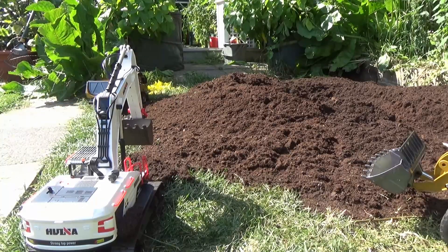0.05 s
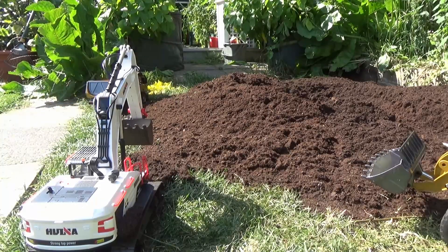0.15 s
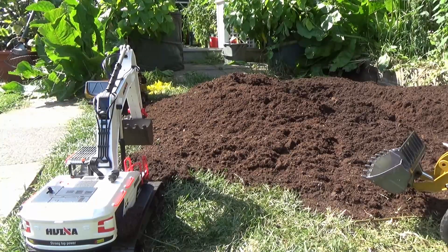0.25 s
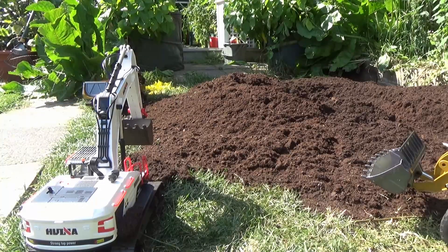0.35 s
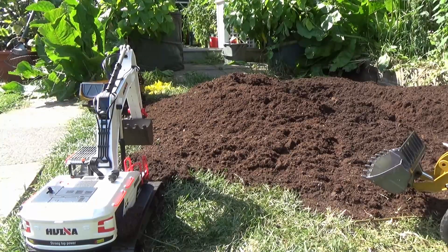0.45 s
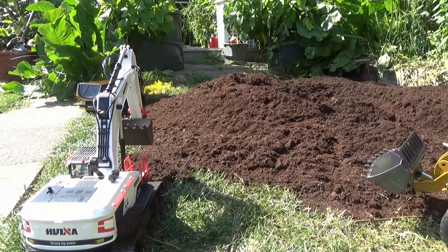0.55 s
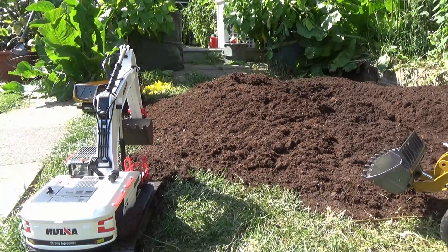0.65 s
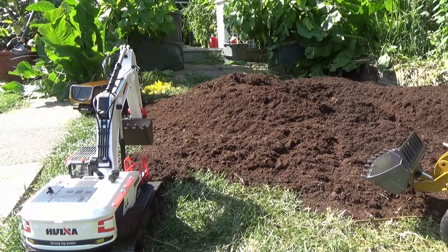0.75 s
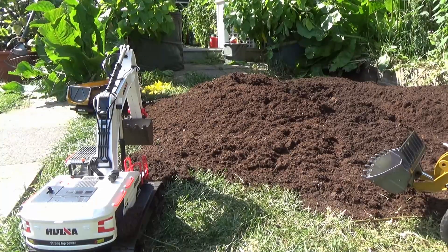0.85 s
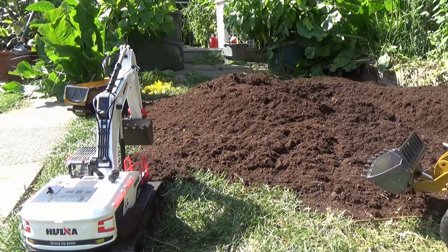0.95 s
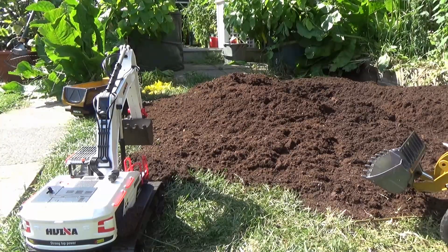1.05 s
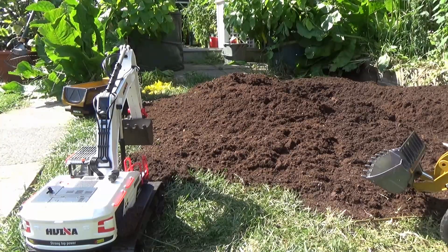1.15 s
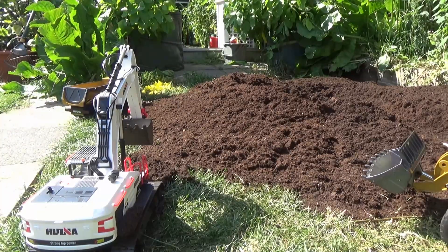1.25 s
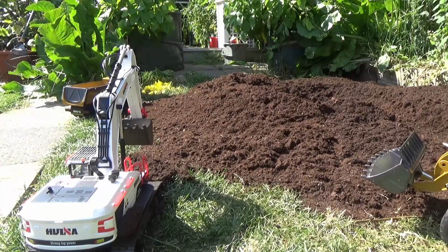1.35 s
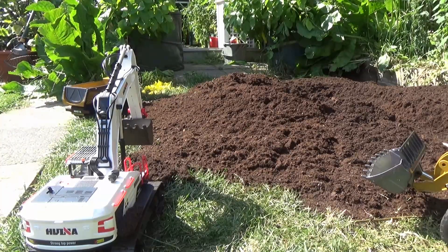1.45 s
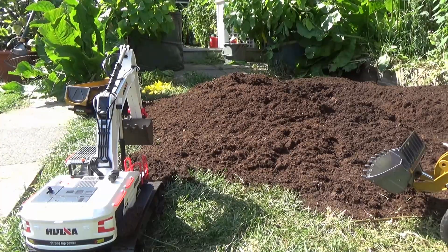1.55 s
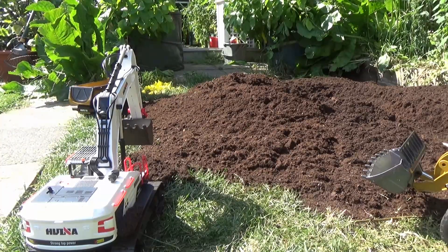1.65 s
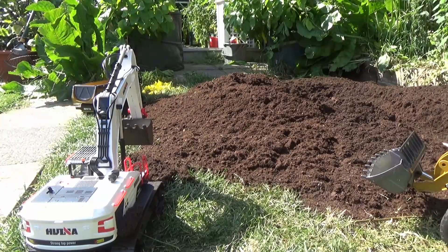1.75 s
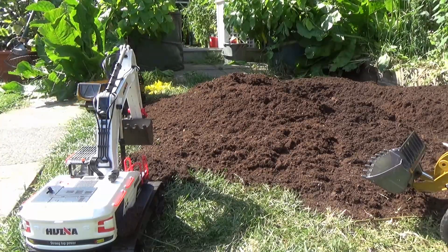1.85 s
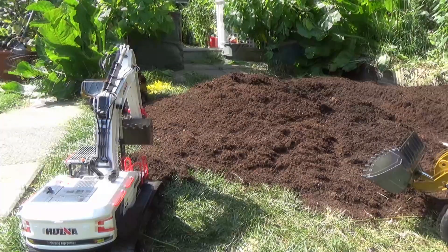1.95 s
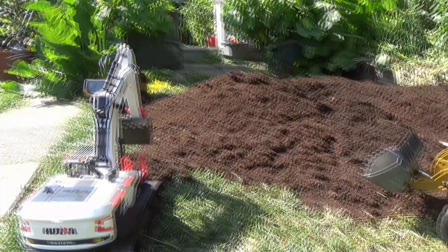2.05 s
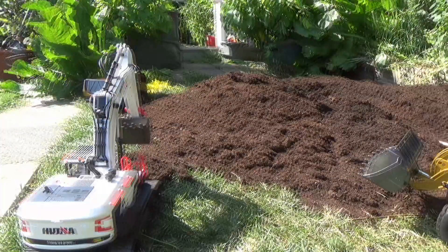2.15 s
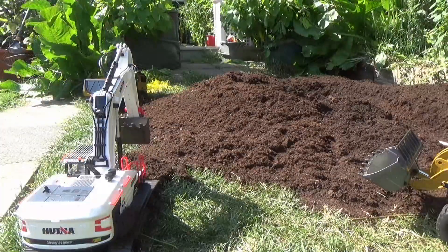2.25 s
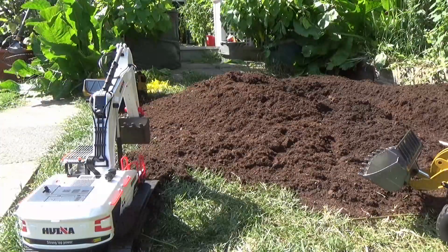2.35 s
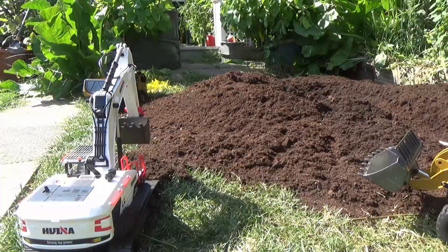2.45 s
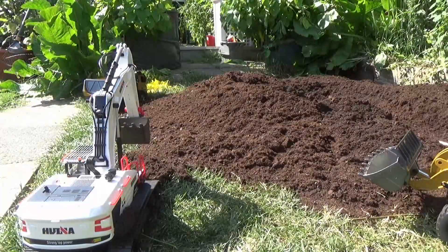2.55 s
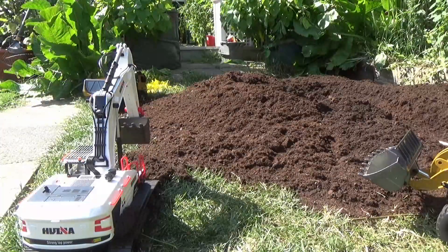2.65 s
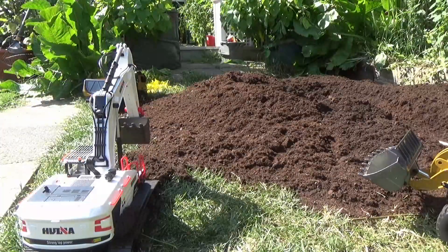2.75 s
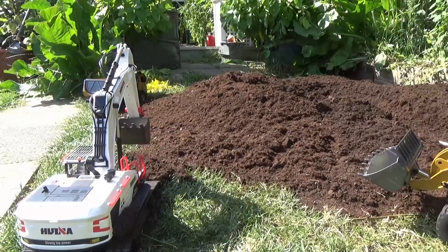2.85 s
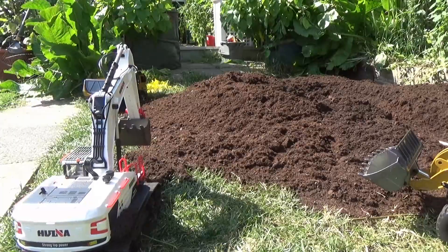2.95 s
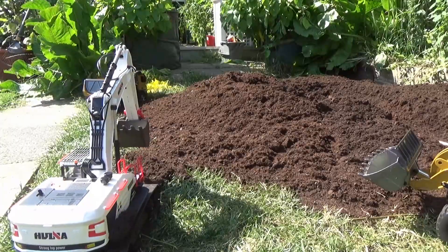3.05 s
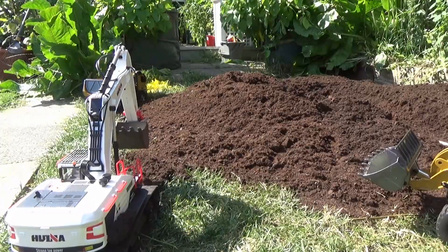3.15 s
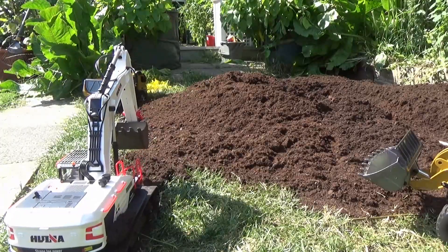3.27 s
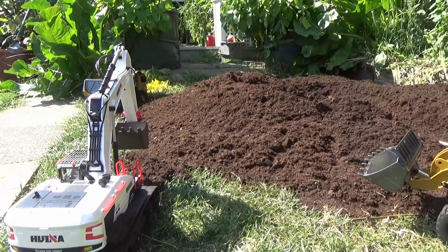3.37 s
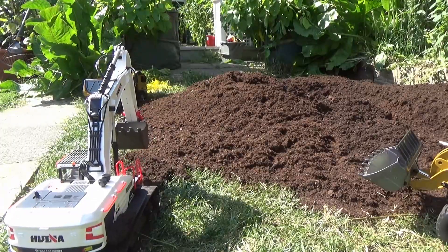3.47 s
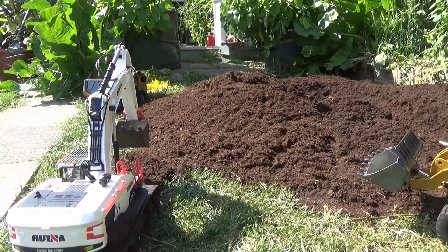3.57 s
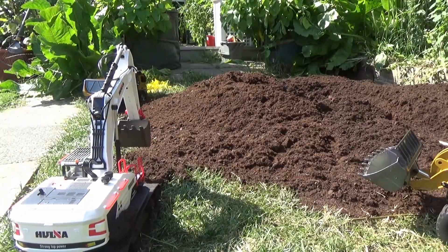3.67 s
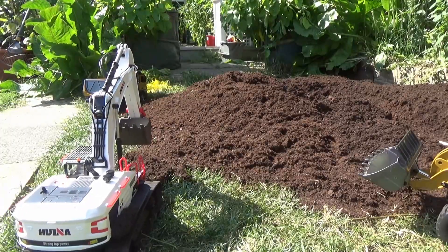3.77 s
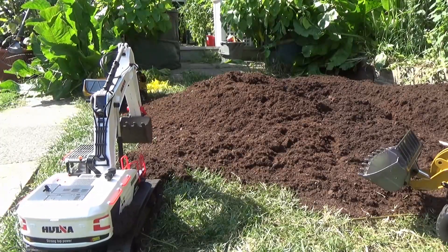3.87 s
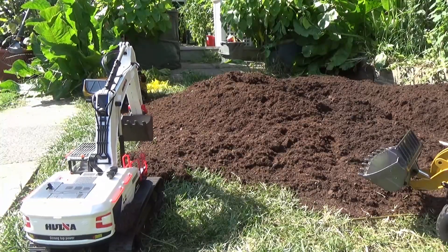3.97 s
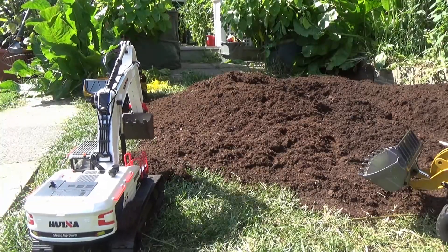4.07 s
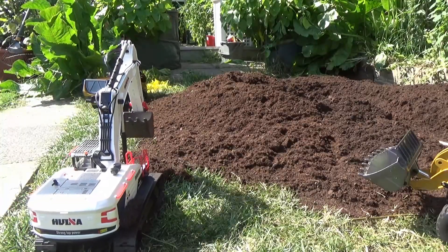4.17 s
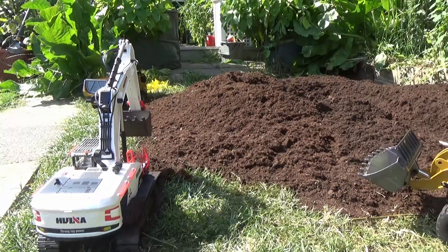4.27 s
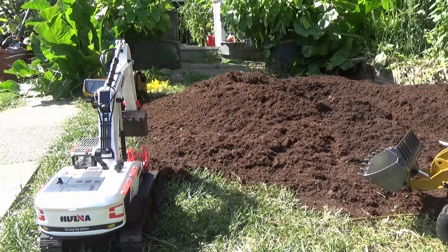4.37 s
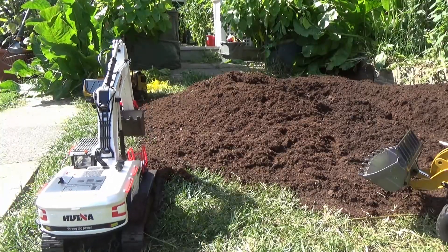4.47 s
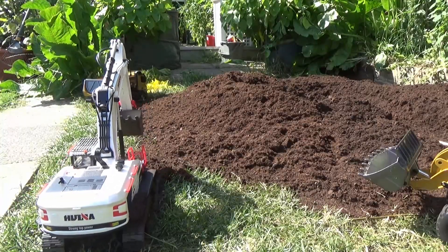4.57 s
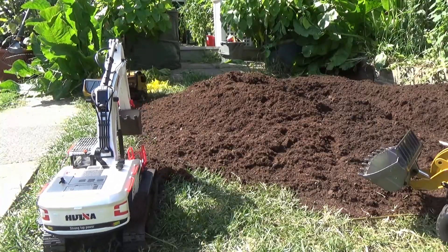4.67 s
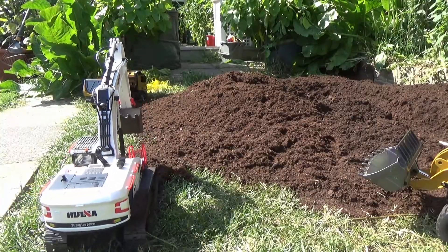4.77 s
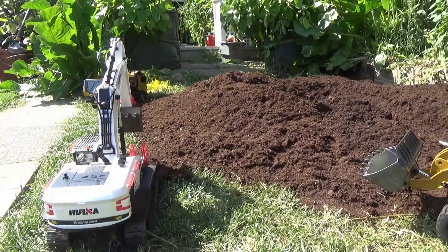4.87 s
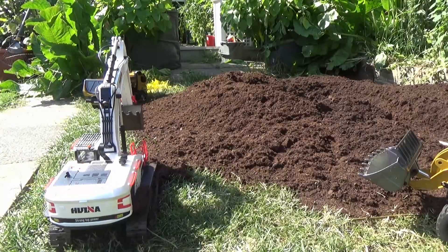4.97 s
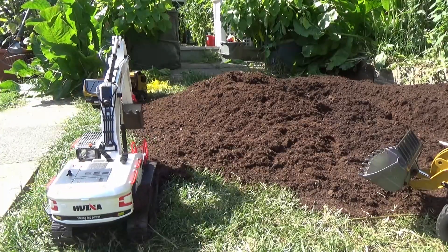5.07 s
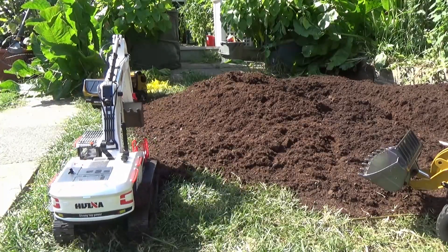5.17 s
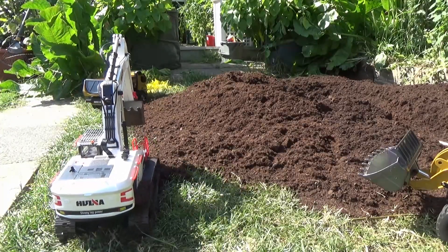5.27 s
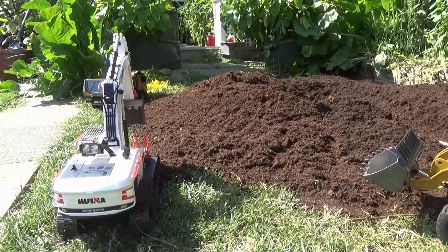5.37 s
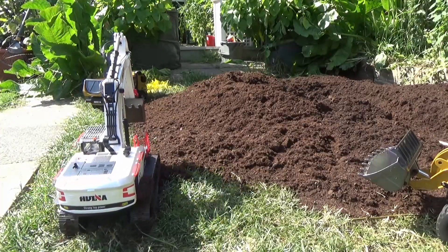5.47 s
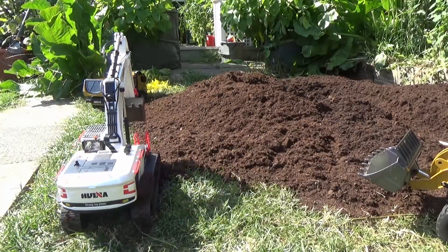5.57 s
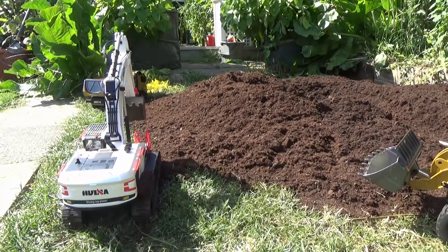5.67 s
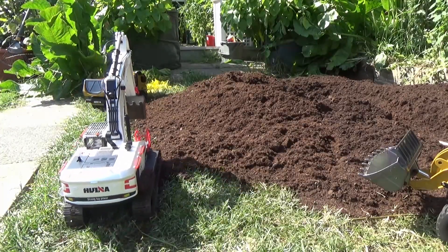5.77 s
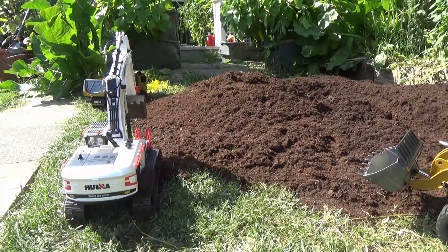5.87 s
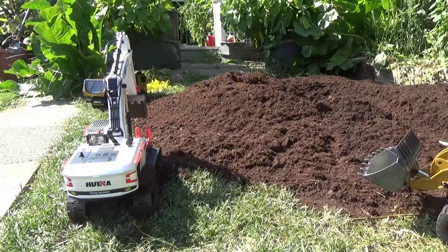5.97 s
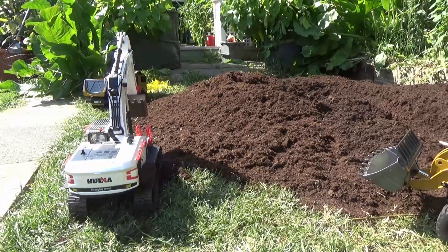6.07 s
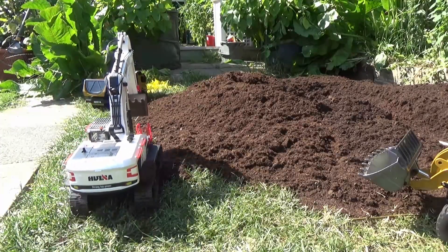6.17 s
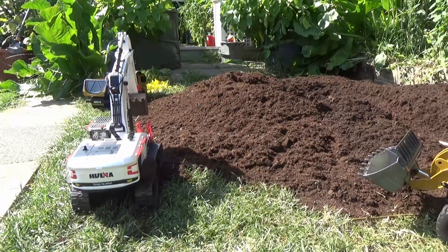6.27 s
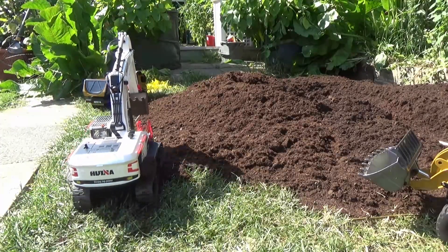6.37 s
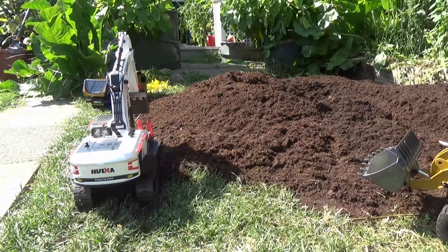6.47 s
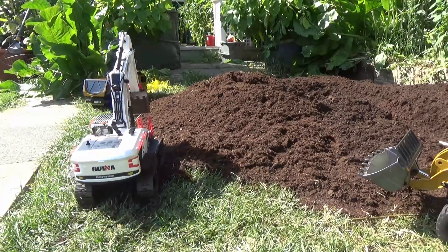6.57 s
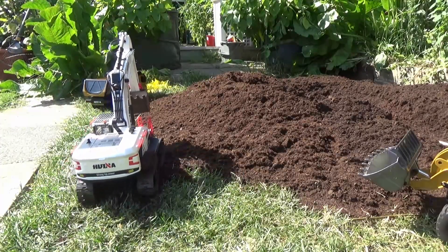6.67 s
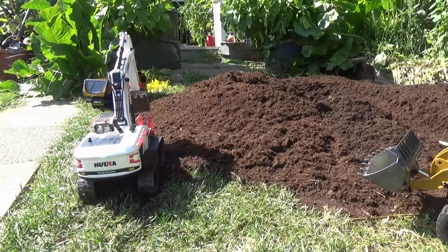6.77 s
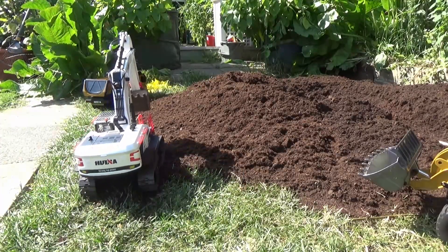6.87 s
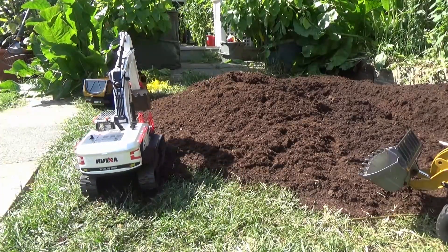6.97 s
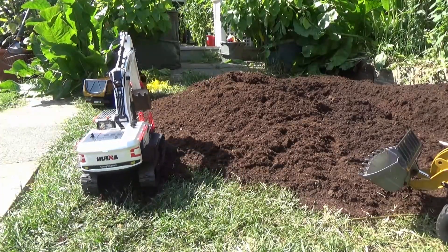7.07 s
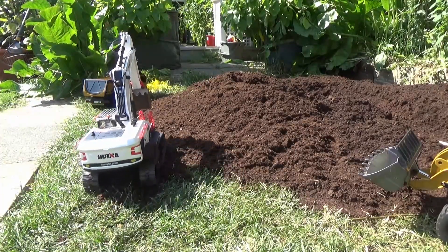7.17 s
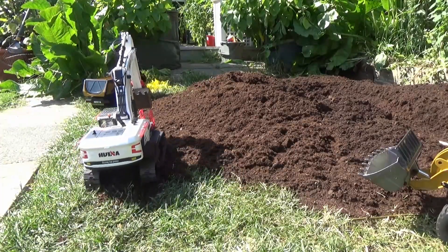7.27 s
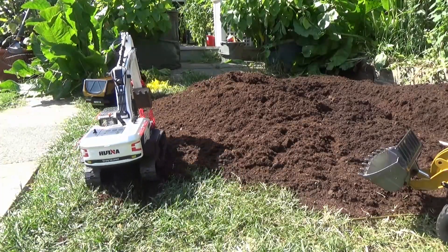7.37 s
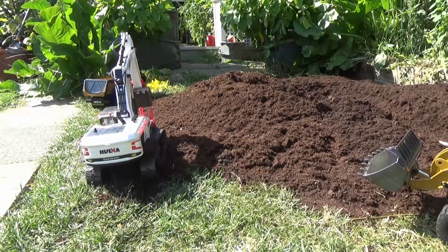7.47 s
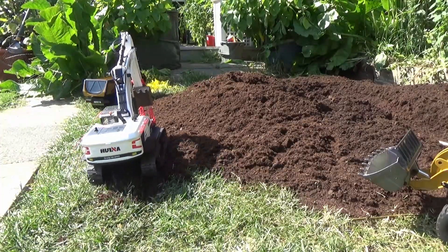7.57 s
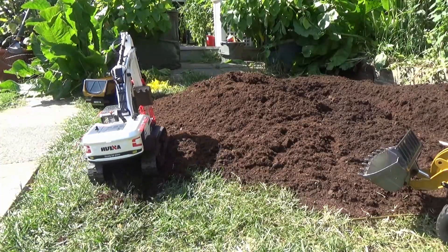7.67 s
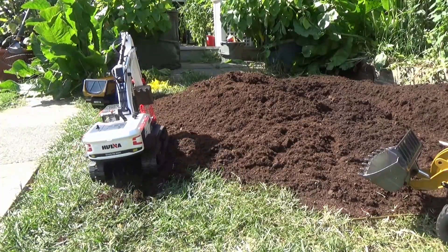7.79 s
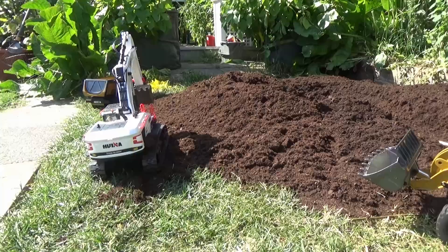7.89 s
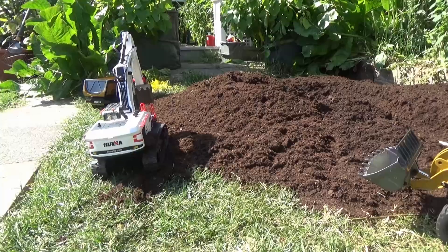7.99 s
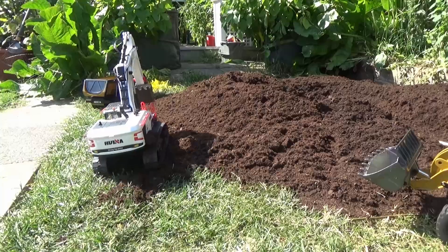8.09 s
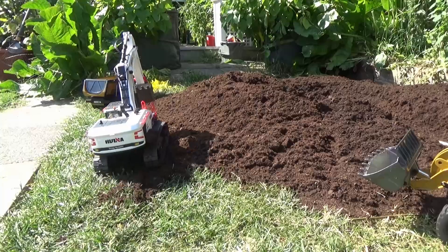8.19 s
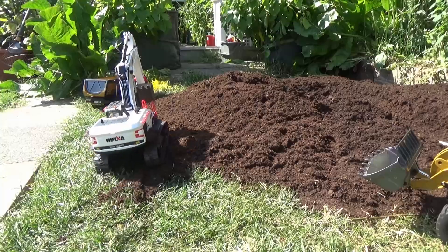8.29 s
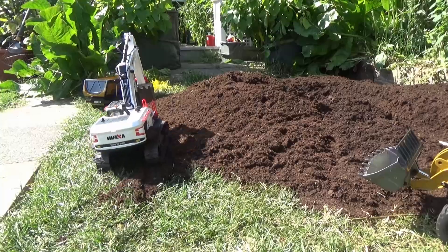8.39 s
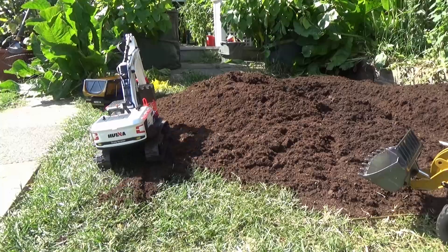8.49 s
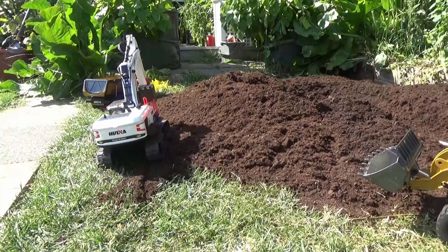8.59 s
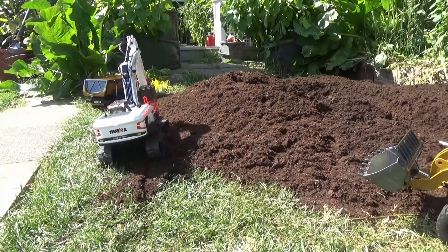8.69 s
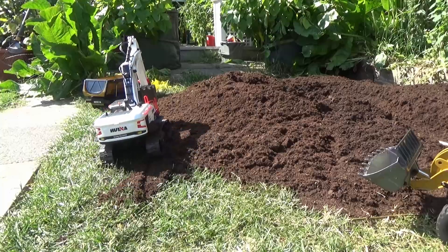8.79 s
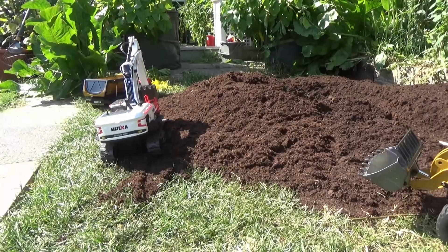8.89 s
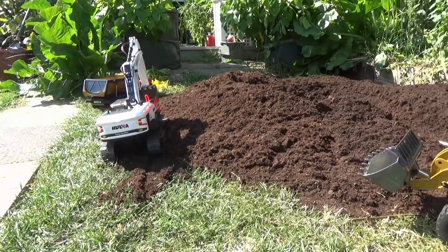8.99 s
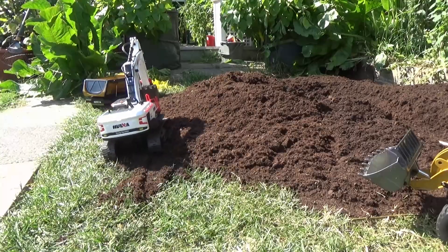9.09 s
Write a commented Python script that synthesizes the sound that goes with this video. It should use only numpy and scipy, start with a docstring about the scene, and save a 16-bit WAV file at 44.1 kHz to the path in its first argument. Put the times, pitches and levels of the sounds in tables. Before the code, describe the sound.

A toy excavator's small electric motors whine and rattle, swinging the cab twice, then driving its tracks steadily over grass.

```python
"""A toy excavator in a garden. Its motor driver sings briefly, then the slewing motor swings the cab out and
back, and gears click as they take up slack. Two track motors jog the toy, then drive it off over crunching
grass; one track stops and restarts to steer, and later a dry axle squeaks. Throughout, each small motor
whines at multiples of its shaft speed while plastic teeth rattle its housing, over a distant rumble."""
import sys
import numpy as np
from scipy import signal
from scipy.fft import rfft, irfft, next_fast_len
from scipy.io import wavfile
from scipy.ndimage import map_coordinates

SR = 44100
rng = np.random.default_rng(int(sys.argv[2]) if len(sys.argv) > 2 else 0)


def materialize(psi):
    """Save the field psi as 16-bit PCM at rate SR to the path in sys.argv[1].

    A 1-D psi becomes a single channel; in a 2-D psi each row is a channel.
    """
    bounded = np.clip(np.atleast_2d(psi).T, -1, 1)
    quanta = np.round(bounded * 32767).astype(np.int16)
    wavfile.write(sys.argv[1], SR, quanta)


N = 403074

# runs of each track motor: on/s, off/s, spin-up/s, coast/s, rattle/dB, chatter/dB,
# tooth-rate whine trim/dB, overtone whine trim/dB
TRACK_A_RUNS = [(2.85, 3.15, .072, .17, -27, -18, 7, 0), (3.51, 4.17, .055, .16, -30.5, -26, 0, -1),
                (4.69, 9.5, .05, .16, -30.5, -27, -1, -1)]
TRACK_B_RUNS = [(2.848, 3.155, .055, .155, -20, -17.5, 0, -8), (3.51, 9.5, .057, .155, -22, -24, 0, -1)]
PINION_TEETH = 10
RATTLE_GROWS = 0.67  # a track's rattle and hum follow its pace to this power


def track_a():
    """The faster, growlier track motor, which pauses to steer and fades as it drives away."""
    # speed the ground allows under power: t/s, shaft speed/Hz
    cruise = [(3.15, 226), (3.75, 239.5), (4.05, 233), (4.15, 227.6), (4.88, 233), (5.07, 225), (5.28, 227),
              (5.48, 233), (5.7, 236), (6.22, 237), (6.41, 228.3), (6.65, 231), (6.74, 236), (6.87, 234.5),
              (7.04, 238.5), (7.4, 239.5), (7.75, 237), (7.97, 240), (8.17, 236), (8.58, 236),
              (8.82, 240.5), (8.94, 234.5), (9.14, 233)]
    # gearbox housing colour: f/Hz, level/dB
    housing = [(200, -30), (450, -10), (800, -23), (1000, 0.5), (1300, -11.5), (1650, 7.5), (2000, -21),
               (2500, 1), (3100, -18), (4000, -3), (5800, -5.5), (8000, 8), (10000, -32), (12500, -1),
               (15500, -24)]
    # hum of rotor and second gear stage: multiple of shaft speed, level/dB
    orders = [(2, -22.5), (3, -11.5), (4, -23), (4.33, -36), (5, -4.5), (5.67, -32), (6, -3), (6.33, -12),
              (6.67, -10), (7, -8), (7.33, -43), (8, -45), (9, -11), (10.33, -11.5), (15, -12), (18, -19.5),
              (21, -4.5), (30, -7.5)]
    # resonances the pinion sweeps through: f/Hz, width/Hz, level/dB
    resonances = [(1500, 1100, -31), (2350, 300, -38), (3700, 900, -29.5), (4780, 280, -29.5),
                  (7100, 700, -40), (9120, 300, -25.5)]
    pace, age, rattle_db, chatter_db, mesh_db, upper_db = motor(TRACK_A_RUNS)
    speed = pace * curve(cruise)
    turns = shaft(speed, flutter=0.001395, age=age)
    fade_db = 0.5 * age
    load = pace ** RATTLE_GROWS * amp(rattle_db - fade_db + .5 * wobble(7.5))
    rattle = teeth(turns, housing, chance=1.5, scatter=0.064, t60=0.023, slide=0.46, count=30)
    drone = at_speed(speed, 204, 254) * hum(turns, orders, waver_db=1.6)
    whine = pinion(turns, speed, resonances, mesh_db, upper_db, waver_db=3, age=age)
    return load * (amp(1.5) * rattle + drone) + amp(chatter_db) * chatter(turns, pace) + whine


def track_b():
    """The slower, shriller track motor, which labours while the other one stands."""
    # speed the ground allows under power: t/s, shaft speed/Hz
    cruise = [(3.15, 219), (3.8, 231), (4.13, 220.3), (4.45, 224.3), (4.55, 218.6), (4.68, 227),
              (4.85, 218), (5.03, 217), (5.5, 223), (5.8, 224), (6.03, 227.3), (6.18, 227), (6.36, 221),
              (6.54, 224.3), (6.63, 222), (6.75, 225), (7.1, 227.3), (7.4, 226.5), (7.56, 223.5),
              (8.02, 228), (8.18, 224.7), (8.28, 227), (8.6, 226), (8.79, 228), (9.03, 225.5), (9.14, 222)]
    # shared battery, a surge as track A cuts out and a sag as it restarts: t/s, speed change/Hz, rise/s
    surges = [(4.165, 7.5, .045), (4.7, -39, .038)]
    # gearbox housing colour: f/Hz, level/dB
    housing = [(200, -36.5), (700, -14.5), (1300, -9.5), (1750, -8), (2900, -13), (3900, -4.5), (5200, -5),
               (6300, -6.5), (7300, -3.5), (8300, 3.5), (9300, 0), (10200, -2.5), (11500, -11),
               (15500, -18.5)]
    # hum of rotor and second gear stage: multiple of shaft speed, level/dB
    orders = [(3, -19.5), (4.67, -27.5), (6, -18.5), (8, -25), (15, -20.5), (17, -22), (17.67, -19),
              (18, -21), (20, -19.5), (21.67, -18.5), (24, -21), (33, -67), (35, -11), (36, -13.5),
              (38, -3), (39, -16), (41, -22), (50, -17)]
    # resonances the pinion sweeps through: f/Hz, width/Hz, level/dB
    resonances = [(1800, 600, -28), (3700, 600, -31), (4540, 350, -32), (6700, 300, -29), (7550, 600, -22),
                  (8760, 450, -19.5), (11200, 500, -37)]
    pace, age, rattle_db, chatter_db, mesh_db, upper_db = motor(TRACK_B_RUNS)
    t, surge = np.arange(N) / SR, np.zeros(N)
    for start, change, rise in surges:
        progress = np.maximum(t - start, 0) / rise
        surge += change * progress * np.exp(1 - progress)
    speed = pace * (curve(cruise) + surge)
    turns = shaft(speed, flutter=0.000916, age=age)
    load = pace ** RATTLE_GROWS * amp(rattle_db + .5 * wobble(9))
    rattle = teeth(turns, housing, chance=0.81, scatter=0.03, t60=0.0053, slide=0.68, count=30)
    rattle *= 1 + 0.25 * np.sin(4 * np.pi * turns)  # the teeth press harder twice a turn
    drone = at_speed(speed, 124, 277) * hum(turns, orders, waver_db=3.0)
    drag_db = 12.5 * np.maximum(pace - motor(TRACK_A_RUNS)[0], 0)  # dragging the standing track
    whine = pinion(turns, speed, resonances, mesh_db + drag_db, upper_db, waver_db=2.5, age=age)
    return load * (amp(-2) * rattle + amp(-0.5) * drone) + amp(chatter_db) * chatter(turns, pace) + whine


def slew():
    """A looser, raspier gearbox swings the cab out and back, loading the other flanks on the return."""
    # cab swings: on/s, off/s, spin-up/s, coast/s, rattle/dB, mesh tone/dB, opening bite/dB
    swings = [(-.5, -.07, .03, 0.12, -21.5, -20, 0), (.192, 1.025, 0.04, .12, -22, -19, 6),
              (1.453, 2.088, .022, .012, -22.5, -15, 7)]
    # speed under power: t/s, shaft speed/Hz
    powered_speed = [(.27, 141), (.35, 143), (.43, 148), (.6, 144), (.77, 141), (.86, 137), (.97, 154),
                     (1.03, 143), (1.5, 141), (1.56, 140), (1.64, 147), (1.75, 142), (1.8, 151),
                     (1.86, 136), (1.94, 147), (2.05, 158)]
    # gearbox housing colour: f/Hz, level/dB
    housing = [(200, -30), (500, -20), (1050, -8.5), (1600, -18), (2000, -10.5), (2400, -6), (3200, -5),
               (3900, -4.5), (5200, -5), (6900, -11.5), (8300, -7.5), (10200, -9.5), (12000, -19),
               (15500, -27)]
    # gear hum: multiple of shaft speed, level swinging out/dB, level swinging back/dB
    orders = [(3, -29, -31), (4, -25, -21.5), (5, -29, -27), (8, -21, -23.5), (9, -21, -32), (15, -22, -21),
              (17, -24, -24), (22.15, -20, -19), (27, -17, -22), (28.2, -23, -20)]
    # ringing cab panels: f/Hz, width/Hz, level/dB
    cab_modes = [(2570, 180, -2), (3800, 80, 1), (4810, 100, -10), (7700, 300, -3.5), (8620, 180, -3.5),
                 (10330, 220, -6.5)]

    def panels(f):
        return 1 + sum(amp(db) * 1j * f * width / (hz * hz - f * f + 1j * f * width)
                       for hz, width, db in cab_modes)

    pace, age, rattle_db, mesh_db, bite_db = motor(swings)
    speed = np.sqrt(pace) * curve(powered_speed)
    turns = shaft(speed, flutter=0.00403, age=age)
    load = pace ** 1.57 * amp(rattle_db)
    rattle = teeth(turns, housing, chance=1.0, scatter=0.14, t60=0.052, slide=1.76, count=20)
    rattle *= (1 + 0.065 * np.sin(2 * np.pi * turns)) * amp(0.91 * wobble(69.8))
    out, back = (hum(turns, np.array(orders)[:, [0, way]], waver_db=4.0) for way in (1, 2))
    drone = np.where(np.arange(N) / SR < 1.3, out, back)
    bite = np.exp(-age / 0.27)  # the teeth bite hard until the cab gets moving
    mesh = amp(mesh_db + bite_db * bite) * tone(turns, order=18, waver_db=4.5)
    whine = at_speed(speed, 103, 121) * (mesh + drone)
    return load * (amp(-0.65) * unit(filtered(rattle, panels)) + amp(2.4) * filtered(whine, panels))


def motor(runs):
    """Pace 0-1 (exponential spin-up, straight coast), then the current run's age/s and level columns."""
    t, runs = np.arange(N) / SR, np.array(runs)
    current = np.maximum(np.searchsorted(runs[:, 0], t) - 1, 0)
    on, off, spin_up, coast, *levels = runs[current].T
    age = np.maximum(t - on, 0)
    pace = (1 - np.exp(-age / spin_up)) * np.clip(1 - (t - off) / coast, 0, 1)
    return pace, age, *levels


def shaft(speed, flutter, age, settle_s=.04):
    """Turns made so far; the speed sways with the load, flutters, and jerks as gears take up slack."""
    sway = .0022 * wobble(14) + flutter * wobble(60)
    jerk = .2 * np.exp(-age / settle_s) * wobble(300)
    return np.cumsum(speed * np.abs(1 + sway + jerk)) / SR


def teeth(turns, housing, chance, scatter, t60, slide, count):
    """Each of a wheel's count teeth strikes in its own way, partly by chance, and the housing rings."""
    own_size, own_lag = rng.choice([-1, 1], count), rng.uniform(-0.33, 0.33, count)
    strike = np.arange(int(turns[-1] * PINION_TEETH))
    size_luck, lag_luck = rng.standard_normal((N // 8, 2))[:len(strike)].T
    position = strike + own_lag[strike % count] + scatter * lag_luck
    at_sample = np.interp(position, turns * PINION_TEETH, np.arange(N))
    size = own_size[strike % count] + chance * size_luck
    taps = at_sample.astype(int)[:, None] + np.arange(-5, 7)
    pulses = size[:, None] * np.sinc(taps - at_sample[:, None])  # blows land between samples
    blows = np.bincount(np.clip(taps, 0, N).ravel(), pulses.ravel(), N + 1)[:N]
    running_share = np.mean(np.diff(turns) > 0)
    scrape = slide * rng.standard_normal(N)  # the flanks slide over each other
    force = unit(blows) * np.sqrt(running_share) + scrape
    t = np.arange(SR // 40) / SR
    shell = rng.standard_normal(len(t)) * amp(-60 * t / t60)
    shell *= 0.52 / np.linalg.norm(shell)
    shell[0] += 1  # the dry attack
    return coloured(signal.fftconvolve(force, shell)[:N], housing)


def pinion(turns, speed, resonances, mesh_db, upper_db, waver_db, age, seat_s=0.045, rise_s=0.025):
    """Tooth-rate harmonics enter once the teeth seat; each swells as it sweeps into a resonance."""
    whine = np.zeros(N)
    for harmonic in range(1, 6):
        order = harmonic * PINION_TEETH
        gain = sum(amp(db) / (1 + (2 * (order * speed - hz) / width) ** 2) for hz, width, db in resonances)
        whine += gain * amp(mesh_db if harmonic == 1 else upper_db) * tone(turns, order, waver_db)
    seated = np.clip((age - seat_s) / rise_s, 0, 1)
    return seated * at_speed(speed, 60, 188) * whine


def hum(turns, orders, waver_db):
    """Rotor and gears hum in a stack of tones, each snapped to a whole third of the shaft speed."""
    return sum(amp(db) * tone(turns, round(order * 3) / 3, waver_db) for order, db in orders)


def tone(turns, order, waver_db, jitter_rad=.5):
    """One multiple of the shaft speed, rms 1, wavering in level and phase."""
    phase = 2 * np.pi * (order * turns + rng.random()) + jitter_rad * wobble(45)
    return unit(np.sin(phase) * amp(waver_db * (0.52 * wobble(7) + 0.76 * wobble(50))))


def at_speed(speed, least_hz, full_hz):
    """A 0-1 fade: gears only sing once they spin fast."""
    return np.clip((speed - least_hz) / (full_hz - least_hz), 0, 1)


def chatter(turns, pace):
    """Slack gears chatter while a track gathers or loses speed."""
    # chatter colour: f/Hz, level/dB
    colour = [(300, -22), (800, 0), (1200, 8), (2000, 14), (3000, 1), (4000, 11), (5000, -12), (12000, -37)]
    slack = pace * np.sqrt(1 - pace)
    return slack * teeth(turns, colour, chance=0.89, scatter=0.034, t60=0.023, slide=1.0, count=10)


def crunch(hits_per_s=7.5, t60=.03):
    """Track links tick and crush the grass at random while the toy rolls."""
    # colour of links on grass: f/Hz, level/dB
    colour = [(500, -23), (2000, -18), (3200, 20), (6000, -3), (14000, -18)]
    hits = (rng.random(N) < hits_per_s / SR) * amp(-29.5 + 3.3 * rng.standard_normal(N))
    decay = amp(-60 * np.arange(SR // 10) / SR / t60)
    pace = motor(TRACK_B_RUNS)[0]
    return pace * signal.fftconvolve(hits, decay)[:N] * coloured(rng.standard_normal(N), colour)


def squeaks():
    """A dry axle sings in short, thin notes."""
    # axle notes: t/s, length/s, start f/Hz, end f/Hz, level/dB
    notes = [(5.26, .04, 10850, 10560, -26), (5.309, .1, 10800, 10700, -32),
             (6.005, .03, 11870, 11780, -32), (6.225, .03, 11950, 11980, -27),
             (7.128, .105, 11800, 11680, -22.5), (7.239, 0.13, 11720, 11770, -18.5),
             (7.355, 0.11, 11880, 11900, -22), (8.454, 0.046, 11300, 11700, -21)]
    t, out = np.arange(N) / SR, np.zeros(N)
    tremble = 1 + 0.00092 * wobble(87)
    for start, length, start_hz, end_hz, db in notes:
        on = (t > start) & (t < start + length)
        progress = (t[on] - start) / length
        pitch = (start_hz + (end_hz - start_hz) * progress) * tremble[on]
        envelope = amp(db + 1.5) * np.sqrt(np.sin(np.pi * progress))
        out[on] += envelope * np.sin(2 * np.pi * np.cumsum(pitch) / SR)
    return out


def clicks():
    """Taking up slack, teeth snap against each other and knock the plastic body."""
    # gear clicks: t/s, snap/dB, knock/dB
    hits = [(1.206, -36, -36), (1.251, -39, -27.5), (2.859, -22, -30), (3.354, -42, -53),
            (3.393, -24.5, -51), (3.437, -48, -65), (3.514, -48, -27)]
    # modes of the plastic body: f/Hz, level/dB, t60/s
    body_modes = [(302, -7.5, 0.063), (450, -11, 0.044), (707, 1, 0.061), (1044, 10.5, 0.015),
                  (1245, -2.5, 0.035), (2070, -3.5, 0.021)]
    # snap colour: f/Hz, level/dB
    colour = [(300, -30), (1500, -21), (2500, -2), (6000, 3), (10000, -3), (15500, -15)]
    t = np.arange(SR // 6) / SR
    knock_attack = 1 - np.exp(-t / 0.00037)
    snap_decay = amp(-60 * t / 0.011) + 0.21 * amp(-60 * t / 0.11)
    snaps, knocks = np.zeros(N), np.zeros(N)
    for start, snap_db, knock_db in hits:
        ring = sum(amp(db - 60 * t / t60) * np.sin(2 * np.pi * (hz * t + rng.random()))
                   for hz, db, t60 in body_modes)
        knocks[round(start * SR):][:len(t)] += amp(knock_db) * ring * knock_attack
        snaps[round(start * SR):][:len(t)] += amp(snap_db) * snap_decay
    return knocks + snaps * coloured(rng.standard_normal(N), colour)


def driver(start_s=0.099, end_s=0.203, edge_s=0.019):
    """Chopped current makes the stalled windings sing before the rotor turns."""
    # partials of the chopping tone: f/Hz, level/dB
    partials = [(2428, -44.5), (4856, -50.5), (7300, -49), (9733, -62), (12155, -65)]
    t = np.arange(N) / SR
    gate = np.clip(np.minimum(t - start_s, end_s - t) / edge_s + .5, 0, 1)
    return amp(1) * gate * sum(amp(db) * np.sqrt(2) * np.sin(2 * np.pi * hz * t) for hz, db in partials)


def surroundings(x, t60):
    """Ground and fence scatter a short tail, different at each ear."""
    # tail EQ: f/Hz, level/dB
    tail_eq = [(100, -18), (400, -10), (1300, -4.5), (2500, -60.5), (15000, -21.5)]
    t = np.arange(SR // 4) / SR
    tail = rng.standard_normal((2, len(t))) * amp(-60 * t / t60) * (t > .002)
    wet = signal.fftconvolve(x[None], tail / np.linalg.norm(tail[0]), axes=1)[:, :N]
    return filtered(wet, lambda hz: amp(along(tail_eq, hz)))


def garden():
    """A bed of distant outdoor rumble, nearly mono; it sinks once the tracks run."""
    # rumble colour: f/Hz, level/dB
    colour = [(12, -34), (20, -10), (167, -2), (203, -7), (444, -13.5), (526, -17), (639, -9.5),
              (715, -13.5), (799, -22), (869, -13.5), (2310, -28), (5970, -29.5), (14600, -35),
              (15900, -32)]
    # stereo width: f/Hz, side minus mid/dB
    width = [(25, -25), (70, -19), (250, -24.5), (2000, -14)]
    # fader ride: t/s, level/dB
    ride = [(0, -41.5), (1.2, -40), (2.8, -42), (2.95, -48), (3.45, -49.5), (6, -48.5), (9.14, -49.5)]
    mid, side = coloured(rng.standard_normal((2, N)), colour)
    side = filtered(side, lambda hz: amp(along(width, hz)))
    return amp(curve(ride) + 0.28 * wobble(6)) * np.array([mid + side, mid - side])


def amp(db):
    """Decibels to gain."""
    return 10 ** (np.asarray(db) / 20)


def unit(x):
    """Scale to rms 1."""
    return x / np.sqrt(np.mean(x ** 2) + 1e-20)


def along(points, hz):
    """Read (f/Hz, value) points on a log axis."""
    f, values = np.transpose(points)
    return np.interp(np.log(hz + 1), np.log(f + 1), values)


def curve(rows):
    """One value per sample from (t/s, value) rows."""
    return np.interp(np.arange(N) / SR, *np.transpose(rows))


def wobble(rate):
    """A smooth random curve, rate knots a second."""
    return map_coordinates(rng.standard_normal(int(N * rate / SR) + 4), [np.arange(N) * rate / SR])


def filtered(x, response):
    """x through a frequency response."""
    size = next_fast_len(N + SR // 4)
    return irfft(rfft(x, size) * response(np.fft.rfftfreq(size, 1 / SR)), size)[..., :N]


def coloured(x, spectrum):
    """x through an EQ of (f/Hz, level/dB) points, at rms 1."""
    return unit(filtered(x, lambda hz: amp(along(spectrum, hz))))


def scene():
    """The excavator sits a little to the left, over the garden bed; its drive eases once, briefly."""
    # pan by frequency: f/Hz, left minus right/dB
    balance = [(100, -.5), (250, 1), (500, 1.5), (1300, 1.5), (2200, 3.9), (3000, -3.5), (4500, -1.5),
               (8000, 2.98), (13000, -2.5)]
    lull_at_s, lull_width_s, lull_db = 7.315, 0.06, -4.5
    lull = amp(lull_db * np.exp(-((np.arange(N) / SR - lull_at_s) / lull_width_s) ** 2))
    drive = lull * (track_a() + track_b() + crunch())
    toy = drive + slew() + driver() + squeaks() + clicks()
    direct = filtered(toy, lambda hz: amp(along(balance, hz) * np.array([[.5], [-.5]])))
    return direct + surroundings(toy, t60=0.037) + garden()


def record(dry):
    """A soft clip rounds the highest peaks, then a brick-wall low-pass cuts the very top."""
    ceiling, top_hz = .55, 15900
    rounded = dry / (1 + np.abs(dry / ceiling) ** 6) ** (1 / 6)
    return filtered(rounded, lambda hz: hz < top_hz)


dry = scene()
out = record(dry)
materialize(out)
```